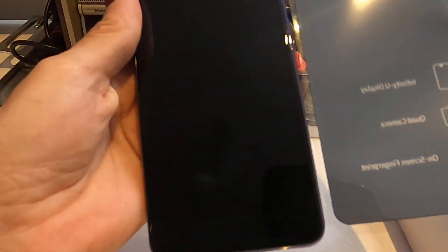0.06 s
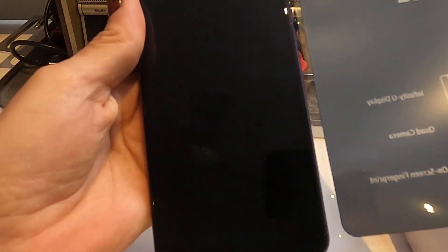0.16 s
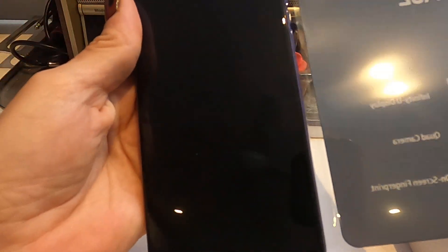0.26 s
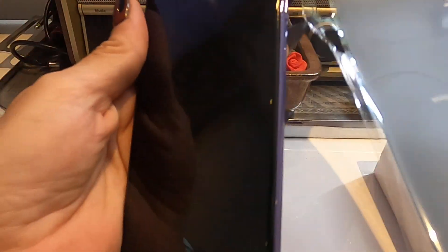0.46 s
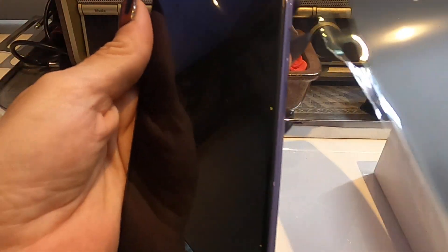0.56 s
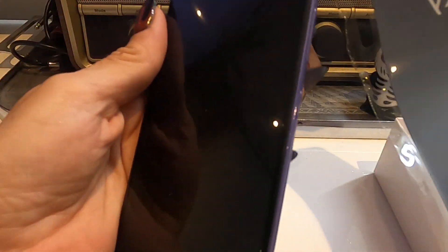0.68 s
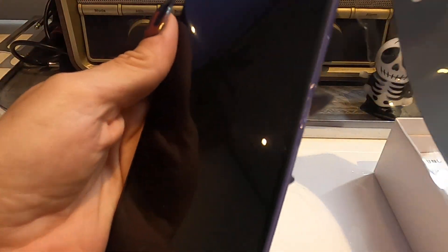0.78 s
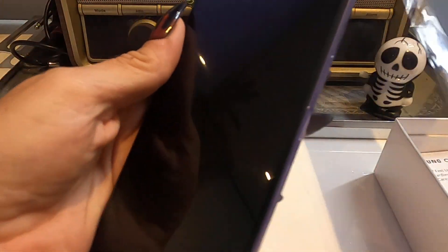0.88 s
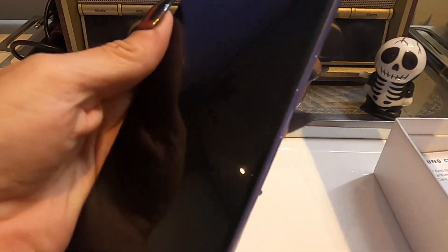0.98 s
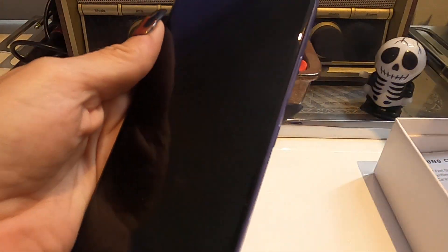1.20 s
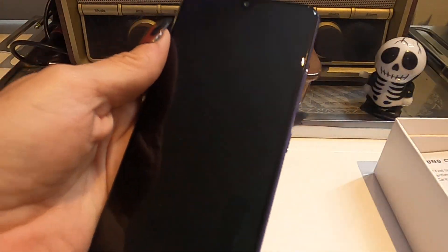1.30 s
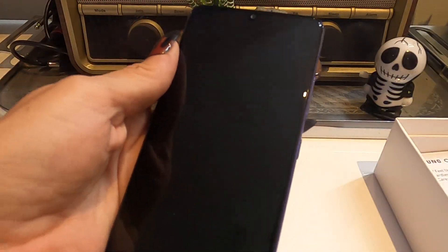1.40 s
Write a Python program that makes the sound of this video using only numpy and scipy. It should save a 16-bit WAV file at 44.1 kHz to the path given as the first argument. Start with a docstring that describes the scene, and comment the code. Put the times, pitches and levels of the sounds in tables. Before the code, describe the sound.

Thin plastic protective film peels off a phone with sharp crackling snaps and short rips, close up

```python
"""A thin plastic film is peeled off a phone, close to the microphone in a small room with a low hum.
After soft finger bumps the bending sheet snaps: dispersive bending waves bring the highs before the lows.
Then it comes unstuck in short rips, dense runs of tiny slips, with a soft low thump.
It buckles once more, as decaying modes, and snaps again.
Last, fingers shift on it with faint ticks and crinkles; grainy skin friction varies in level throughout."""
import sys
import numpy as np
from scipy import signal
from scipy.fft import rfft, irfft
from scipy.io import wavfile

SR = 44100
rng = np.random.default_rng(int(sys.argv[2]) if len(sys.argv) > 2 else 0)


def dump(signal):
    """Clip the signal to [-1, 1] and save it as 16-bit WAV at the path in sys.argv[1]."""
    limited = np.clip(np.atleast_2d(signal).T, -1, 1)
    pcm = np.round(limited * 32767).astype(np.int16)
    wavfile.write(sys.argv[1], SR, pcm)


N = 63945
SIZE = 131072  # transform length, samples
HZ = np.maximum(np.arange(SIZE // 2 + 1) * SR / SIZE, 1)
T = np.arange(N) / SR

# Spectrum of the low room noise: f/Hz, relative level/dB
FLOOR_COLOUR = [(25, -26.5), (50, -1), (100, 2.5), (170, 3.5), (300, -6), (600, -15.5), (2000, -13.5),
                (5000, -29), (9000, -38.5), (16000, -58)]
FLOOR_DB = -55
# Partials of the appliance's hum: f/Hz, RMS level/dB
HUM_PARTIALS = [(50, -65), (101, -60), (160, -59), (201, -60.5)]

# Diffuse room tail, colour: f/Hz, relative level/dB
ROOM_COLOUR = [(100, -2), (300, 9.5), (1000, -5.5), (3500, -3.5), (7000, -5), (14000, 1.5)]
# Reverberation time: f/Hz, time to fall 60 dB/s
ROOM_T60 = [(150, 0.2), (400, 0.23), (1000, .38), (4000, 0.28), (7000, 0.25), (12000, 0.23)]
ROOM_DB, ROOM_BUILD_S = -14.5, 0.0028
DESK_S, DESK_DB = 0.0104, -22  # echo of the things on the desk

# Fingers sliding on the film: t/s, RMS level/dB
RUB_LEVEL = [(0, -40), (.03, -51), (.19, -51), (.4, -49.5), (.75, -70), (.8, -49.5), (.85, -66.5),
             (1.23, -63.5), (1.3, -54.5), (1.33, -53), (1.39, -56.5), (1.45, -48.5)]
# Colour of that friction: f/Hz, relative level/dB
RUB_COLOUR = [(100, 17), (300, 13.5), (700, 7.5), (1800, 4.5), (4000, -8.5), (9000, -17), (15000, -37)]
RUB_GRAINS_PER_S, RUB_SPREAD_DB = 1700, 5

# Soft low thuds, from finger bumps, the flexing sheet and a late knock:
# t/s, level/dB, f/Hz, Gaussian 1/e half-width/s
THUDS = [(.004, -37.5, 205, 0.0086), (.151, -41.5, 161, 0.013), (0.4291, -32, 133.2, 0.0068),
         (0.49, -13, 127.3, 0.0049), (0.501, -21.5, 219, 0.01), (0.661, -40, 414, 0.0057),
         (1.365, -39, 390, 0.0033)]

# Modes of the buckling sheet: f/Hz, relative level/dB, time to fall 60 dB/s
POP_MODES = [(210, -12.5, 0.058), (345, -8.5, 0.027), (580, -14, 0.0157), (1786, 3.5, 0.0044),
             (1963, 3, 0.015), (3475, -8, 0.017), (4780, 3, 0.0075), (5940, 1.5, 0.0088),
             (6700, 0.5, 0.005)]
POP_S, POP_DB = 0.8963, -12.5

# Band centres for the levels of snaps and rips: f/Hz
SNAP_BANDS_HZ = [300, 1300, 2900, 5300, 10000]
# Band centres for the levels of ticks: f/Hz
TICK_BANDS_HZ = [450, 2300, 5300, 10000]
# Rips and crinkles, runs of tiny slips in the film: t/s, length/s, then level/dB in each snap band
RIPS = [(.448, .028, -14.5, -22, -14, -35, -29), (.477, .04, -11.5, -17.5, -21.5, -24.5, -65),
        (0.786, 0.024, -43.5, -48, -42, -61, -65), (.9, 0.0091, -15.5, -24, -24, -35, -51.5),
        (.914, 0.041, -36, -47.5, -31, -43.5, -54), (.967, 0.023, -10.5, -7, -9, -14, -33.5),
        (0.972, 0.0057, -20, -25, -26, -4, -25.5), (.993, 0.04, -18.5, -28, -27.5, -37.5, -58.5),
        (1.308, 0.099, -42.5, -39.5, -43.5, -50.5, -57), (1.359, 0.014, -31.5, -39, -39, -52, -56),
        (1.385, 0.008, -45, -30.5, -39.5, -36, -46)]
SLIPS_PER_S, SLIP_SPREAD_DB, RIP_RELEASE_S = 4000, 3, 0.003
# Faint ticks of creases and fingertips: t/s, then level/dB in each tick band
TICKS = [(0.041, -24.5, -38, -32, -30), (0.1522, -15, -10.5, -22, -18.5), (0.4149, -8, -19.5, -20, -31),
         (0.5245, -18, -4, -21, -37), (0.7858, -14, -8, -12.5, -37), (.8005, -15.5, -22, -28, -26),
         (.807, -13, -15.5, -17, -43), (0.88, -28, -42, -21, -41), (0.887, -19.5, -23.5, -19.5, -42),
         (1.004, 3, -13, -12, -14.5), (1.0225, -7, -2.5, -10, -31), (1.1413, -25, -17, -19.5, -35.5),
         (1.247, -29, -13, -48, -44), (1.2717, -29.5, -32, -24, -24), (1.292, -34, -34, -28, -19.5),
         (1.3155, -17, -6.5, -10.5, -19), (1.341, -14, -22, -22, -12), (1.36, 4.5, -15, -36, -43),
         (1.3715, -8, -21, -18, -25), (1.3875, -14, -25, -26, -29), (1.393, -15, -10, -24, -25),
         (1.439, -34, -16.5, -20.5, -29.5)]
TICK_PATCH_HZ = 3170  # where the creases ring
# Snaps of the sheet: t/s, dispersion scale/ms, f/Hz of the ringing patch, then level/dB in each snap band
SNAPS = [(.205, 3, 2620, 12.5, 9, -2, -9.5, -10), (.215, 6.24, 1785, 20.5, 8.5, 7.5, -8, -14.5),
         (0.2368, 4, 2320, 13, 8.5, -0.5, -7, -22), (0.2565, 0.74, 5270, 8, 6, 0, 1, -7),
         (.267, 2.14, 2750, 21.5, 18, 15.5, 0.5, 4.5), (0.2939, 2.59, 1490, 15.5, 11, 6, 2.5, -13.5),
         (0.4254, 0.76, 1200, 16, 18, 11, 10, -5), (0.4447, 0.66, 2820, 17, 18.5, 11.5, 19.5, -17),
         (.4487, .8, 4150, 23.5, -1, 17, 5, -21), (0.4535, 1.23, 4370, 14.5, 12, 15.5, 12.5, -8.5),
         (0.46, 0.16, 4000, 11, 12.5, 7, 7, -8), (0.4655, 0.25, 4130, -3, 11.5, 7, 8.5, -11.5),
         (.4682, .2, 4650, 4, 9, 12, -3.5, -10), (0.4712, 0.17, 4490, 13, 5, 10, 13, -9),
         (0.4888, 0.72, 2400, 14.5, 12, 7.5, -4, -13.5), (.495, 0.67, 2500, 12, 9.5, 1, 2, -31),
         (0.5104, .8, 2700, 10.5, 4, 8.5, -18, -19.5), (0.5149, 0.93, 3770, 1, 3, 3.5, -4, -31),
         (0.6541, 1.2, 3500, -11.5, -1, 0, -10, -36), (0.8963, 1.15, 4950, 11.5, 8.5, 7, 3.5, -4.5),
         (.9662, 1.19, 6000, 21.5, 14.5, 12.5, 16, -4.5), (0.9706, 0.53, 5700, 4, 10, -2, 13, -13.5),
         (.9901, 0.59, 4760, 8.5, 5, 0.5, 10, -12.5)]

DISPERSION_MS = 0.6  # dispersion scale of ticks and rips
STIFF_HZ = 3790  # bending waves above this arrive together
DIRECT_DB = -14.5  # crack that reaches the air at once, against the bending waves
PATCH_DB, PATCH_OCTAVES = 7.5, 0.13  # height and half-width of the patch resonance
FREE_S = 0.6  # from here the sheet is off the phone
STUCK_BASS_HZ, FREE_BASS_HZ = 133, 222  # the free sheet gives less bass
HOLLOW_HZ, HOLLOW_DB, HOLLOW_OCTAVES = 860, -5, 0.24  # the free sheet sounds hollow here
SCATTER_DB, SCATTER_T60_S = -3, 0.014  # waves bouncing between the sheet's edges
CRACK_LEAD = 32  # samples kept ahead of the crack's onset

# Side signal against mid: f/Hz, level/dB
SIDE_COLOUR = [(100, -50), (500, -46.5), (2000, -48), (5000, -38.5), (8000, -33), (11000, -23.5),
               (13500, -1.5)]
SIDE_ROOM_DB = 15  # gain of the second room tail ahead of the side colour
# Response of the recorder: f/Hz, level/dB
MICROPHONE = [(20, -7), (45, 1), (9500, -1), (11500, -9.5), (13000, -17.5), (16000, -27)]
OVERLOAD_DB, CUTOFF_HZ = -1.2, 17500


def from_db(db):
    """Logarithmic level: decibels to amplitude gain."""
    return 10 ** (np.asarray(db) / 20)


def at_hz(points, hz):
    """Linear interpolation of a table over log frequency."""
    f, v = np.transpose(points)
    return np.interp(np.log(hz), np.log(f), v)


def rms_one(x):
    """Power normalisation: scale to unit RMS."""
    return x / np.sqrt(np.mean(x ** 2) + 1e-20)


def coloured(x, points):
    """Zero-phase filtering: multiply the spectrum by a table of f/Hz, level/dB."""
    return irfft(rfft(x, SIZE) * from_db(at_hz(points, HZ)))[:N]


def add(out, s, wave):
    """Superposition: mix a wave in at a time in seconds."""
    i = max(int(round(s * SR)), 0)
    out[i:i + len(wave)] += wave[:max(N - i, 0)]


def background():
    """Stationary noise and steady sinusoids: low room noise and an appliance's hum."""
    floor = from_db(FLOOR_DB) * rms_one(coloured(rng.standard_normal(N), FLOOR_COLOUR))
    hum = np.zeros(N)
    for hz, db in HUM_PARTIALS:
        hum += from_db(db) * np.sqrt(2) * np.sin(2 * np.pi * (hz * T + rng.random()))
    return hum + floor


def room(x):
    """Reverberation: convolution with one near echo and a diffuse tail that dies band by band."""
    response = np.zeros(N)
    edges = np.geomspace(60, 18000, 9)
    for low, high in zip(edges, edges[1:]):
        hz = np.sqrt(low * high)
        fall = from_db(-60 * T / at_hz(ROOM_T60, hz)) * (1 - np.exp(-T / ROOM_BUILD_S))
        band = signal.butter(2, [low, high], "band", fs=SR, output="sos")
        noise = signal.sosfilt(band, rng.standard_normal(N))
        gain = from_db(ROOM_DB + at_hz(ROOM_COLOUR, hz))
        response += noise * fall / np.linalg.norm(fall) * gain
    add(response, DESK_S, np.array([from_db(DESK_DB)]))
    return signal.fftconvolve(x, response)[:N]


def slips(per_s, spread_db):
    """Stick-slip: random releases of either sign and uneven size, at unit RMS."""
    happens = rng.random(N) < per_s / SR
    sign = rng.choice([-1, 1], N)
    size = from_db(spread_db * np.clip(rng.standard_normal(N), -2, 2))
    return rms_one(happens * sign * size)


def rub():
    """Dry friction: coloured stick-slip grains of skin on the film."""
    grains = rms_one(coloured(slips(RUB_GRAINS_PER_S, RUB_SPREAD_DB), RUB_COLOUR))
    return from_db(np.interp(T, *np.transpose(RUB_LEVEL))) * grains


def thuds():
    out = np.zeros(N)
    for s, db, hz, width in THUDS:
        envelope = np.exp(-((T - s) / width) ** 2)
        out += from_db(db) * envelope * np.sin(2 * np.pi * hz * (T - s))
    return out


def scatter(wave):
    """Multiple reflection: a quick, diffuse decaying tail inside the sheet."""
    t = T[:2048]
    tail = rng.standard_normal(len(t)) * from_db(-60 * t / SCATTER_T60_S)
    tail *= 1 - np.exp(-t * 2000)  # the bounces build up
    tail *= from_db(SCATTER_DB) / np.linalg.norm(tail)
    return signal.fftconvolve(wave, np.r_[1, tail[1:]])


def pop():
    """Modal decay: the loose sheet buckles and its modes ring briefly."""
    ring = np.zeros(N)
    for k, (hz, db, t60) in enumerate(POP_MODES):
        decay = from_db(POP_DB + db - 60 * T / t60)
        ring += (-1) ** k * decay * np.sin(2 * np.pi * hz * T)
    out = np.zeros(N)
    add(out, POP_S, scatter(ring))
    return out


def crack(s, band_hz, levels_db, dispersion_ms, patch_hz=None, size=4096):
    """Dispersion: a release gives a direct crack, then bending waves whose lows arrive after the highs."""
    hz = np.maximum(np.arange(size // 2 + 1) * SR / size, 1)
    db = at_hz(list(zip(band_hz, levels_db)), hz)
    if patch_hz:
        db = db + PATCH_DB / (1 + (np.log2(hz / patch_hz) / PATCH_OCTAVES) ** 2)
    if s > FREE_S:
        db = db + HOLLOW_DB / (1 + (np.log2(hz / HOLLOW_HZ) / HOLLOW_OCTAVES) ** 2)
    bass_hz = STUCK_BASS_HZ if s < FREE_S else FREE_BASS_HZ
    gain = from_db(db) / np.sqrt(1 + (bass_hz / hz) ** 5)
    # folding the cepstrum gives minimum phase, so the energy comes as early as it can
    cepstrum = irfft(np.log(gain + 1e-5))
    causal = np.exp(rfft(np.r_[cepstrum[0], 2 * cepstrum[1:size // 2]], size))
    # delay falls as 1/sqrt(f), down to none at STIFF_HZ; its sum over frequency is the phase
    late_s = dispersion_ms / 1000 * np.maximum(np.sqrt(1000 / hz) - np.sqrt(1000 / STIFF_HZ), 0)
    bending = np.exp(-2j * np.pi * (np.cumsum(late_s) - late_s.sum()) * SR / size)
    direct = from_db(DIRECT_DB)
    wave = irfft(causal * (bending + direct) / (1 + direct))
    return np.roll(wave, CRACK_LEAD)[:size // 2]


def ticks():
    """Impulsive excitation: small releases at creases and fingertips, scattered in the sheet."""
    out = np.zeros(N)
    for s, *levels in TICKS:
        wave = crack(s, TICK_BANDS_HZ, levels, DISPERSION_MS, TICK_PATCH_HZ)
        add(out, s - CRACK_LEAD / SR, scatter(wave))
    return out


def rips():
    """Dense runs of tiny slips: the film rips, tears or crinkles, each slip a small crack."""
    out = np.zeros(N)
    for s, length, *levels in RIPS:
        hold = np.exp(-np.maximum(T - length, 0) / RIP_RELEASE_S)
        run = slips(SLIPS_PER_S, SLIP_SPREAD_DB) * hold
        run *= np.linalg.norm(hold) / (np.linalg.norm(run) + 1e-9)
        add(out, s, signal.fftconvolve(run, crack(s, SNAP_BANDS_HZ, levels, DISPERSION_MS)))
    return out


def snaps():
    """Elastic release: single snaps of the bending sheet, each with a ringing patch."""
    out = np.zeros(N)
    for s, dispersion_ms, patch_hz, *levels in SNAPS:
        wave = crack(s, SNAP_BANDS_HZ, levels, dispersion_ms, patch_hz)
        add(out, s - CRACK_LEAD / SR, scatter(wave))
    return out


def scene():
    """Mid and side superposition: a central film, with a little width from a second room tail."""
    film = thuds() + pop() + ticks() + rips() + snaps()
    mid = background() + room(film) + rub() + film
    quadrature = irfft(1j * rfft(mid, SIZE))[:N]  # mid turned by a quarter cycle
    side = coloured(quadrature + from_db(SIDE_ROOM_DB) * room(film), SIDE_COLOUR)
    return np.array([mid + side, mid - side])


def record(dry):
    """Clipping and band limiting: peaks overload, the recorder dulls the top, then the cut-off."""
    top = from_db(OVERLOAD_DB)
    heard = [coloured(np.clip(channel, -top, top), MICROPHONE) for channel in dry]
    low_pass = signal.cheby2(12, 70, CUTOFF_HZ, fs=SR, output="sos")
    return signal.sosfilt(low_pass, heard)


dry = scene()
out = record(dry)
dump(out)
```